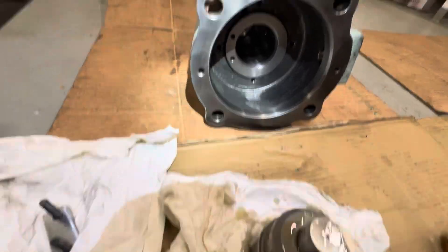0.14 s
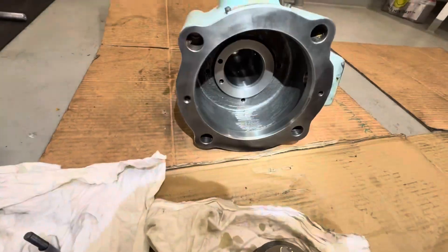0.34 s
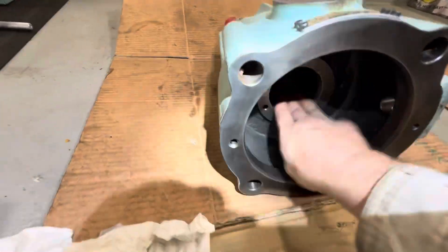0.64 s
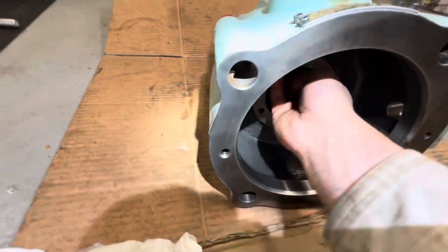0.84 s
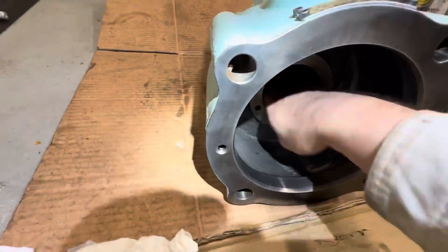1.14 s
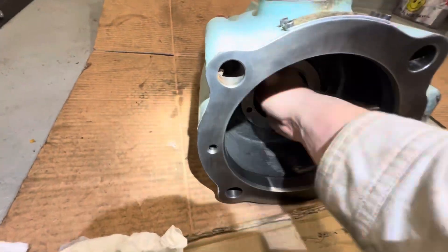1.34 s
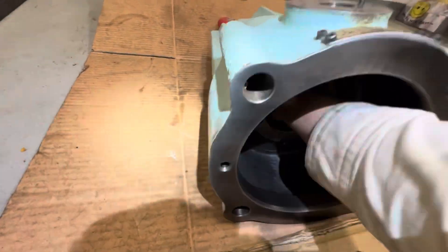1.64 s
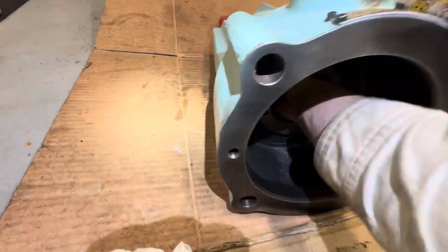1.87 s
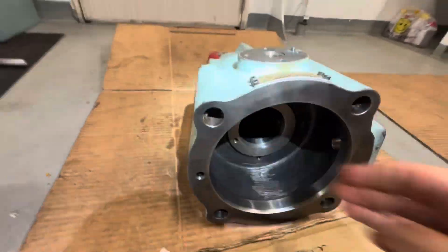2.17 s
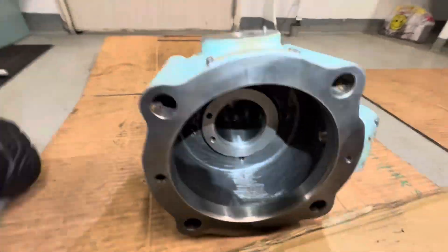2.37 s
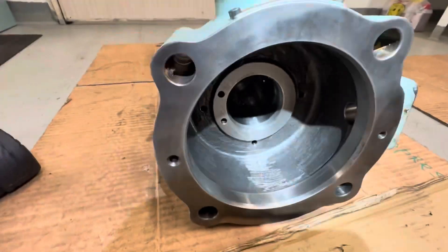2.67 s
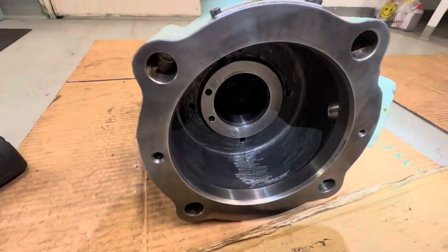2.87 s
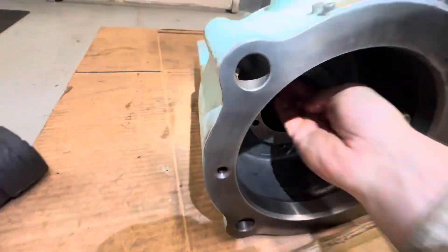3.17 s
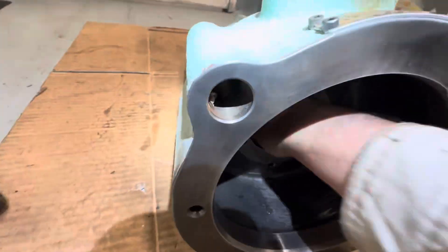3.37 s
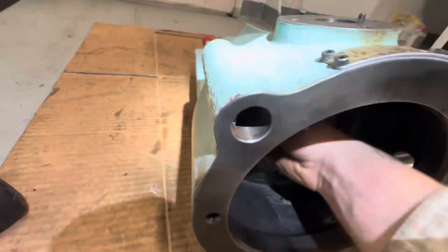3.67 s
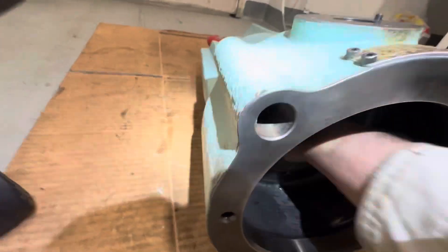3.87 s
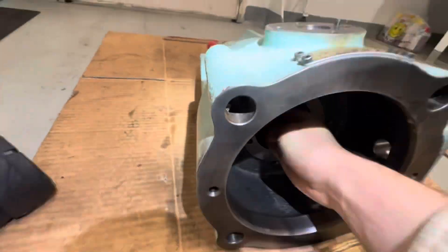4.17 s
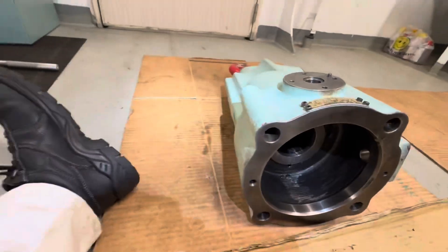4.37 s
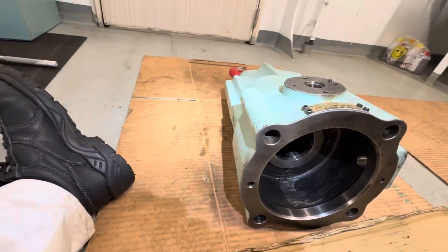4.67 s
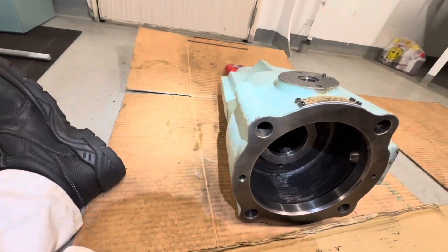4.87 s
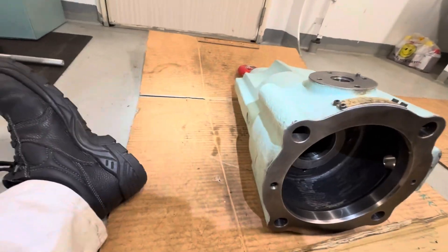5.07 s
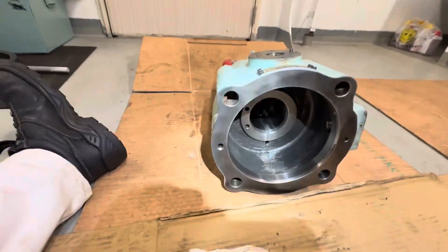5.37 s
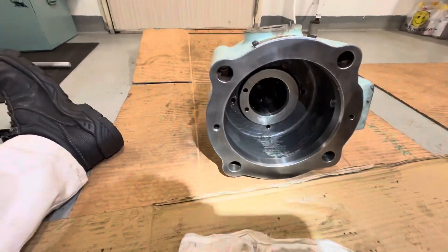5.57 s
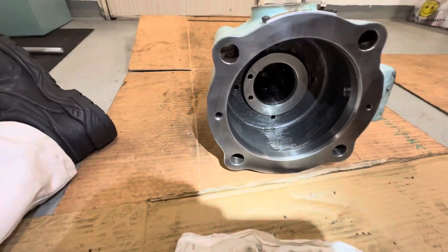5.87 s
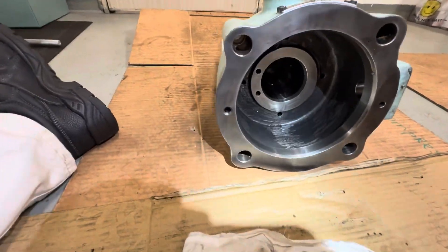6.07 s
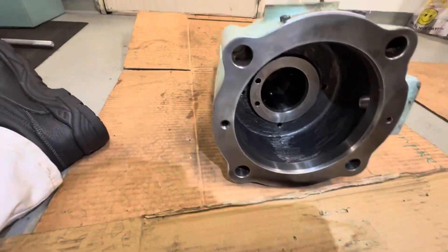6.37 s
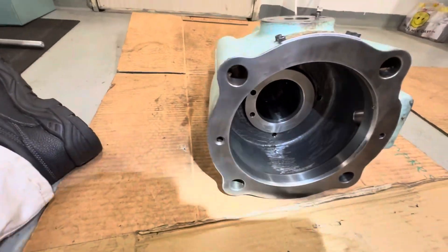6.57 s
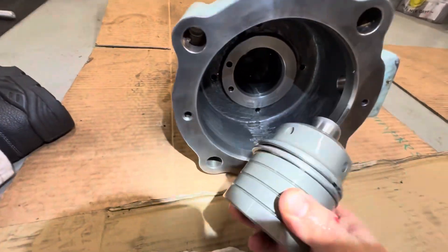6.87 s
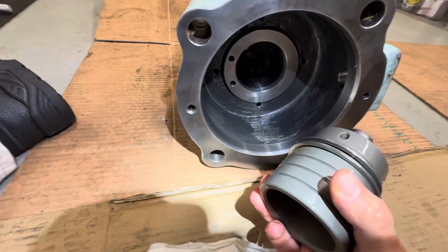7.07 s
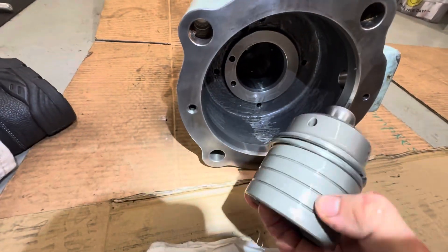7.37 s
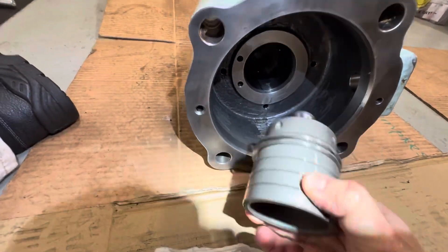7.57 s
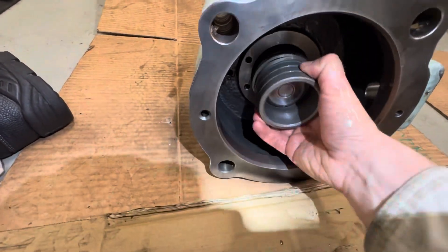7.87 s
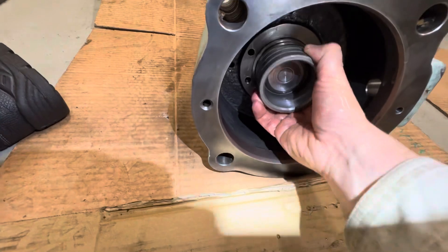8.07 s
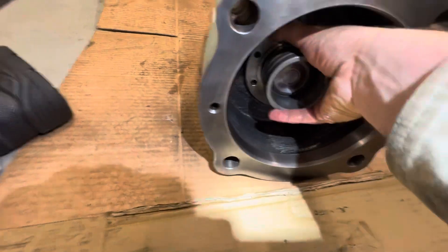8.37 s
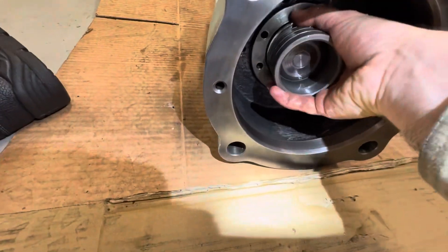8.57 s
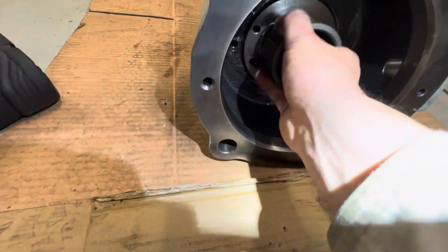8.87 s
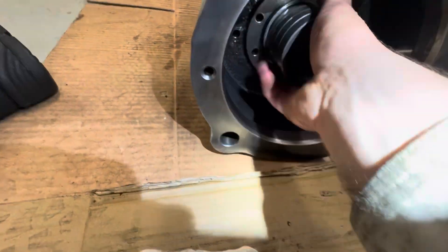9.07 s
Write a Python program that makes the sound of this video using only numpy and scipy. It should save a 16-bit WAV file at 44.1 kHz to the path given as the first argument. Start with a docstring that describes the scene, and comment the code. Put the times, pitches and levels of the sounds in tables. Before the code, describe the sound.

A steady low diesel drone and rushing ventilation, under which someone softly scuffs on cardboard and clicks a metal valve part into place.

```python
"""A workshop corner of a ship's engine room. From the start, diesels throb through the deck, air rushes
through ducts and motor drives whine faintly. Someone crouches at a valve housing, boots and overalls
scuffing on cardboard. From about 4 s, oily hands and metal give short squishes, then the scuffs return.
At 7 s a valve part ticks as it is picked up, and two very faint, very high ticks follow.
The part ticks again on its way to its hole in the housing, and just after 8 s slides in with a hiss."""
import sys
import numpy as np
from scipy import signal
from scipy.fft import rfft, irfft, next_fast_len
from scipy.io import wavfile
from scipy.ndimage import map_coordinates

SR = 44100
rng = np.random.default_rng(int(sys.argv[2]) if len(sys.argv) > 2 else 0)


def digitize_waveform(pressure):
    """Quantize a signal to 16-bit integers and store it at the path in sys.argv[1].

    Rows of a 2-D input are taken as channels; values are limited to [-1, 1].
    """
    field = np.atleast_2d(pressure).T
    bounded = np.clip(field, -1, 1)
    quanta = np.round(bounded * 32767).astype(np.int16)
    wavfile.write(sys.argv[1], SR, quanta)


N = 406144
TIME = np.arange(N) / SR
TOP_HZ = 15750  # upper limit of the treble

# two diesels at slightly different speeds: f/Hz, relative level/dB, pitch wander/Hz
DIESEL_TONES = [(86.3, 0, 1.3), (89.8, -9.5, 1.4)]
# slow rise and fall of their throb: t/s, relative level/dB
THROB_LEVELS = [(0.0, -35), (0.68, -27.5), (0.8, -39.5), (2.01, -34.5), (3.58, -33), (3.7, -28),
                (4.38, -33), (4.58, -39), (5.15, -22.5), (5.47, -39), (5.63, -26.5), (6.31, -44),
                (6.43, -27.5), (8.0, -32.5), (8.12, -27), (8.97, -29), (9.09, -28), (9.21, -34)]
# slow rise and fall of the higher engine hum: t/s, relative level/dB
HUM_LEVELS = [(0.0, -41), (1.21, -43), (1.61, -48), (2.41, -41.5), (3.38, -52.5), (3.54, -40.5),
              (4.06, -51.5), (4.58, -38.5), (4.71, -43), (8.57, -41.5), (8.77, -50), (9.21, -38)]
# booming resonances of the room and its steel plates: f/Hz, width/Hz, relative level/dB
ROOM_RESONANCES = [(167.2, 20.7, -3), (201.6, 10, -4.5), (297.4, 18, -11.5), (380, 25, -18.5),
                   (503, 60, -28)]
# steady tones of other machines: f/Hz, level/dB, pitch wander/Hz
MACHINE_TONES = [(82.2, -44, .5), (91.8, -44, 1), (118, -53, .1), (205, -56, 3), (376, -67, 3),
                 (440, -70, 6), (743, -75, 2), (829, -72, 3), (960, -77, 5), (1364, -80, 4), (1534, -76, 4),
                 (2794, -81, 5), (3784, -87, 8), (4427, -85, 7), (7350, -101, 2)]
# rumble of the deck: f/Hz, relative level/dB
DECK_SPECTRUM = [(10, -30.5), (19, -9), (26, -1.5), (40, 7), (53, 9.5), (70, 8.5), (97, -8.5), (110, 5.5),
                 (128, 1.5), (150, -4.5), (185, -5.5), (260, -11.5), (340, -20.5), (600, -75.5),
                 (2000, -110)]
# rush of air in the ducts: f/Hz, relative level/dB
AIR_SPECTRUM = [(160, 9), (460, 5), (610, -2.4), (890, 0.5), (1170, -4.5), (1560, -2.5), (1940, -2.5),
                (2420, -10), (3520, -10), (4220, -16), (4620, -16.5), (5150, -22.5), (6100, -26.5),
                (7500, -28), (8900, -31), (13500, -32.5)]
# thin tones of the motor drives: f/Hz, relative level/dB
WHINE_TONES = [(9449, -99), (9993, -101), (10168, -102)]
# the whine is louder close to the housing: t/s, relative level/dB
WHINE_LEVELS = [(0, -11), (6.5, -4.5), (7.8, 5), (9.21, -1)]
# boots and sleeves on cardboard: t/s, relative level/dB, length/s, body gain from weight/dB
SCUFF_STROKES = [(.42, -59.5, 0.015, -3), (.475, -66, .015, 0), (1.36, -59, 0.075, -5.5),
                 (1.52, -62, .13, 1), (1.852, -53.5, 0.022, -17), (2.106, -56.5, 0.022, -5),
                 (2.29, -58, 0.026, -1.5), (2.45, -55.5, 0.025, -7.5), (2.597, -57, 0.02, -2),
                 (2.736, -58, .03, -10), (2.961, -47.5, 0.046, -1), (3.172, -59.5, 0.023, 3),
                 (6.424, -54, 0.03, 4), (6.552, -57.5, .07, -7.5), (6.708, -52, 0.025, -19),
                 (7.292, -47.5, 0.035, -1.5), (7.47, -60, 0.033, -17), (7.58, -51, 0.028, -0.5)]
# hiss of the cardboard's fibres: f/Hz, relative level/dB
FIBRE_SPECTRUM = [(320, -20), (1250, 4.5), (2350, -2.5), (3550, 2), (4350, -4.5), (6100, -11),
                  (9100, -15.5), (12100, -20)]
# lower, fuller sound of pressed cardboard: f/Hz, relative level/dB
BODY_SPECTRUM = [(100, -15), (400, -0.5), (800, 2.5), (1250, -2.5), (1600, 2), (1950, 3.5), (2400, -8.5),
                 (4000, -13), (8000, -33.5)]
# squishes of oily hands and metal: t/s, level/dB, length/s
SQUISH_STROKES = [(4.123, -68, .004), (4.415, -72, 0.0037), (4.697, -67, 0.0055), (5.575, -65, .007),
                  (5.835, -67.5, 0.02), (5.917, -61.5, .012), (6, -67, 0.011), (6.033, -64.5, .018),
                  (6.367, -58, 0.012)]
# crackle of the oil: f/Hz, relative level/dB
OIL_SPECTRUM = [(1000, -21), (2700, 2.5), (3800, 1.5), (6000, -2), (7600, -6), (9000, -17), (15500, -17.5)]
# two very faint, very high ticks (7.177 and 7.184 s); the rest are the valve part, muffled by the hand:
# t/s, level/dB, f/Hz, time to fade by 60 dB/s, crack relative to ring/dB
TICK_EVENTS = [(6.9996, -39.5, 2900, .017, -11), (7.177, -61, 14600, .015, -8),
               (7.184, -61, 14600, .015, -8), (7.235, -58, 14800, .015, -4), (7.245, -48, 700, .04, -10),
               (7.709, -58, 7000, .035, -5), (7.747, -63, 10200, .03, -4), (7.8, -40.5, 1740, .035, -15),
               (7.801, -40, 520, .04, -3)]
# the part rubs into its hole: t/s, level/dB
SLIDE_LEVELS = [(0, -100), (8.15, -98.5), (8.33, -64), (8.5, -63.5), (8.65, -74), (8.9, -84.5), (9.21, -84)]
# hiss of oiled steel on steel: f/Hz, relative level/dB
SLIDE_SPECTRUM = [(800, -16), (2200, 4.5), (3000, 11.5), (4200, -1.5), (6000, -9), (9000, -24),
                  (15000, -28.5)]


def amp(db):
    """Turn decibels into a gain."""
    return 10 ** (np.asarray(db) / 20)


def unit(x):
    """Scale a signal to an average (rms) level of 1."""
    return x / np.sqrt(np.mean(x ** 2) + 1e-20)


def wobble(rate):
    """A smooth random curve through `rate` new values a second."""
    knots = rng.standard_normal(int(N * rate / SR) + 4)
    steps = np.arange(0, len(knots) - 1, 1 / 10)
    return np.interp(TIME * rate, steps, map_coordinates(knots, [steps]))


def level(rows):
    """A gain that glides through rows of t/s, level/dB."""
    return amp(np.interp(TIME, *np.transpose(rows)))


def filtered(x, response):
    """Scale each frequency in x by response(hz)."""
    size = next_fast_len(N + SR // 2)
    return irfft(rfft(x, size) * response(np.fft.rfftfreq(size, 1 / SR)), size)[:N]


def noise(spectrum):
    """Noise of average level 1, shaped by rows of f/Hz, level/dB."""
    f, db = np.transpose(spectrum)
    shape = lambda hz: amp(np.interp(np.log(hz + 1), np.log(f), db))
    return unit(filtered(rng.standard_normal(N), shape))


def tone(hz, wander_hz, rate):
    """A pure tone of average level 1 whose pitch wanders."""
    turns = np.cumsum(hz + wander_hz * wobble(rate)) / SR + rng.random()
    return np.sqrt(2) * np.sin(2 * np.pi * turns)


def decay(t, fade_s):
    """A gain that falls by 60 dB every fade_s seconds."""
    return np.exp(-np.log(1000) * t / fade_s)


def stroke(start, length, rise_s, fade_s):
    """The loudness of one rub: it builds up, lasts, then dies away in the steel room."""
    t = np.maximum(TIME - start, 0)
    return (1 - np.exp(-t / rise_s)) * decay(np.maximum(t - length, 0), fade_s)


def diesel_throb(surge_db=2.9):
    """Two low tones drift in and out of step, making a beat that uneven firing roughens."""
    beat = sum(amp(db) * tone(hz, wander, rate=7) for hz, db, wander in DIESEL_TONES)
    firing = amp(surge_db * wobble(rate=21))
    return amp(-1.77) * level(THROB_LEVELS) * unit(beat * firing)


def engine_hum(sway_db=2.5):
    """A higher engine tone wavers quickly while it slowly swells and sags."""
    hum = tone(164.8, wander_hz=1.6, rate=10)
    sway = amp(sway_db * wobble(rate=16))
    return amp(-0.8) * level(HUM_LEVELS) * unit(hum * sway)


def room_boom():
    """The room and its heavy plates boom at a few low pitches and pass almost nothing higher."""
    def resonances(hz):
        return sum(amp(db) * centre * width / (centre ** 2 - hz ** 2 + 1j * hz * width)
                   for centre, width, db in ROOM_RESONANCES)
    return amp(-46.5) * unit(filtered(rng.standard_normal(N), resonances))


def machinery():
    """Other machines hold steady tones over the rumble of the deck."""
    tones = sum(amp(db) * tone(hz, wander, rate=14) for hz, db, wander in MACHINE_TONES)
    return tones + amp(-34.5) * noise(DECK_SPECTRUM)


def ventilation(ripple_db=1.68, spacing_hz=22):
    """Air rushes through ducts whose many resonances lift some pitches and lower others."""
    knots = rng.standard_normal(SR)
    ripple = lambda hz: amp(ripple_db * map_coordinates(knots, [hz / spacing_hz]))
    return amp(-51.0) * unit(filtered(noise(AIR_SPECTRUM), ripple))


def motor_whine():
    """Motor drives give thin, high tones that grow, then ease off near the end."""
    tones = sum(amp(db) * tone(hz, wander_hz=1.3, rate=4) for hz, db in WHINE_TONES)
    return level(WHINE_LEVELS) * tones


def cardboard_scuffs(grain_db=0.4):
    """Fibres catch and slip in a grainy hiss; under weight the cardboard's body joins a moment later."""
    hiss_gain = sum(amp(db) * stroke(start, length, rise_s=0.0028, fade_s=0.34)
                    for start, db, length, _ in SCUFF_STROKES)
    body_gain = sum(amp(db + weight_db) * stroke(start, length, rise_s=0.006, fade_s=0.31)
                    for start, db, length, weight_db in SCUFF_STROKES)
    grain = amp(grain_db * wobble(rate=260))
    hiss = amp(-4.0) * hiss_gain * noise(FIBRE_SPECTRUM)
    body = amp(1.0) * body_gain * noise(BODY_SPECTRUM)
    return grain * (hiss + body)


def oil_squishes(grain_db=2.5):
    """A film of oil pulls apart with a short, high crackle."""
    gain = sum(amp(db) * stroke(start, length, rise_s=0.0017, fade_s=0.23)
               for start, db, length in SQUISH_STROKES)
    grain = amp(grain_db * wobble(rate=400))
    return gain * grain * noise(OIL_SPECTRUM)


def ticks(crack_fade_s=0.014, spread=0.077, count=4):
    """Each tick is a tiny crack and a few close ringing tones that die away quickly."""
    out = np.zeros(N + SR)
    t = np.arange(SR // 8) / SR
    onset = 1 - np.exp(-t / 0.0005)
    for start, db, hz, fade_s, crack_db in TICK_EVENTS:
        offsets = np.linspace(-1, 1, count) + 0.37 * rng.standard_normal(count)
        pitches = hz * (1 + spread * offsets)
        turns = np.outer(pitches, t) + rng.random((count, 1))
        ring = np.sin(2 * np.pi * turns).sum(0) / np.sqrt(count) * decay(t, fade_s)
        crack = rng.standard_normal(len(t)) * decay(t, crack_fade_s)
        # lower ticks have a duller crack
        lowpass = signal.butter(2, min(3 * hz, TOP_HZ), fs=SR)
        crack = signal.lfilter(*lowpass, crack)
        out[round(start * SR):][:len(t)] += amp(db) * onset * (ring + amp(crack_db) * crack)
    return out[:N]


def valve_slide():
    """Oiled steel rubs on steel with a smooth, narrow hiss."""
    return level(SLIDE_LEVELS) * noise(SLIDE_SPECTRUM)


def scene():
    """Machines all around and small sounds close by, in one channel."""
    room = diesel_throb() + engine_hum() + room_boom() + machinery() + ventilation() + motor_whine()
    nearby = cardboard_scuffs() + oil_squishes() + ticks() + valve_slide()
    return (room + nearby)[None]


def record(dry):
    """Fade both ends over 4 ms and cut the highest treble."""
    fade = np.clip(np.minimum(TIME, TIME[-1] - TIME) / 0.004, 0, 1)
    return filtered(fade * dry[0], lambda hz: hz < TOP_HZ)[None]


dry = scene()
out = record(dry)
digitize_waveform(out)
```